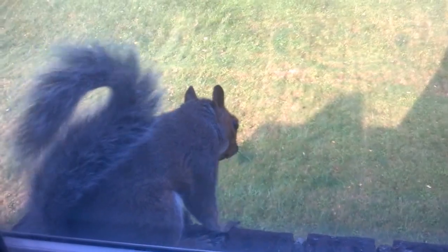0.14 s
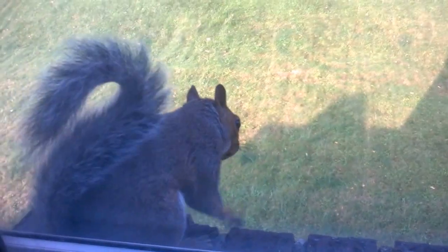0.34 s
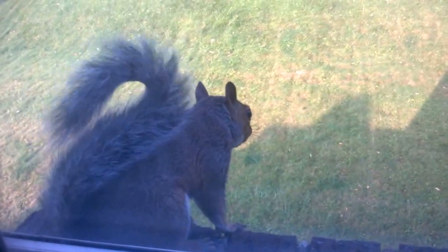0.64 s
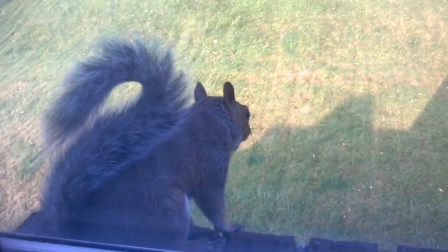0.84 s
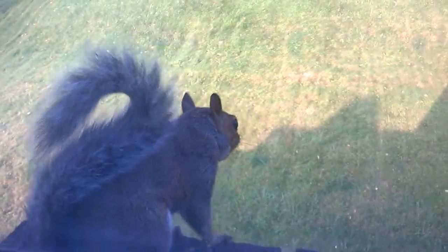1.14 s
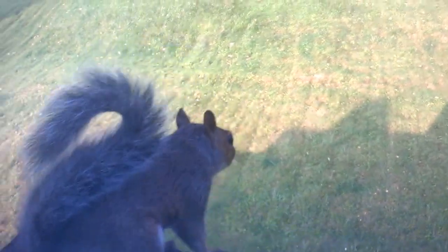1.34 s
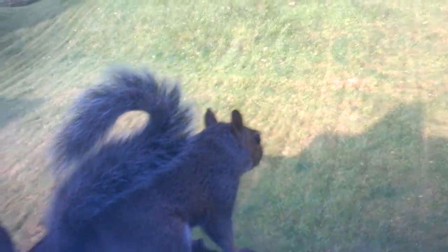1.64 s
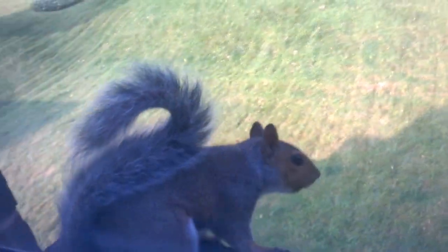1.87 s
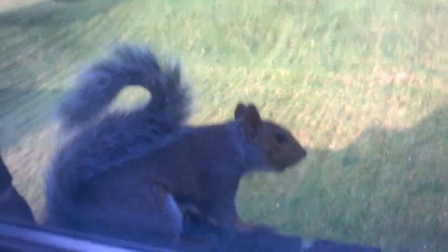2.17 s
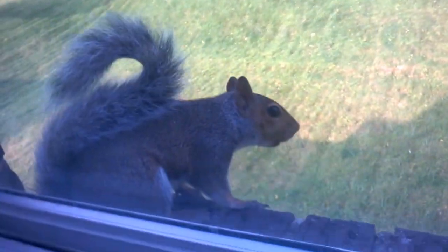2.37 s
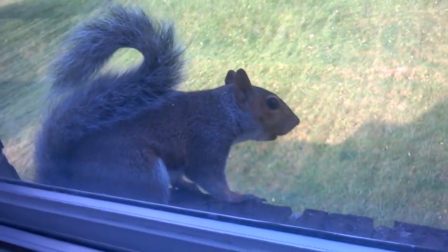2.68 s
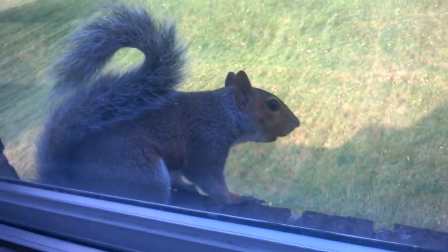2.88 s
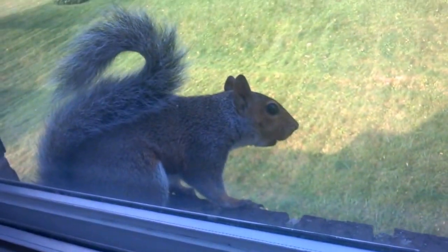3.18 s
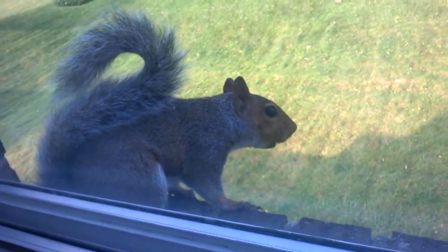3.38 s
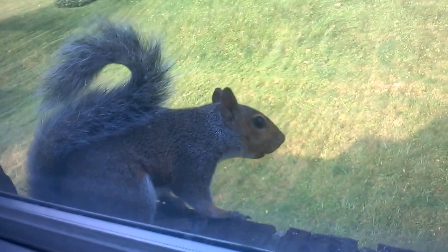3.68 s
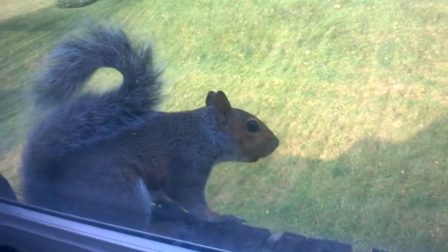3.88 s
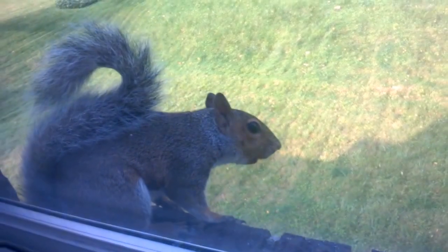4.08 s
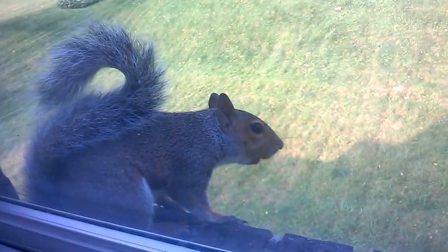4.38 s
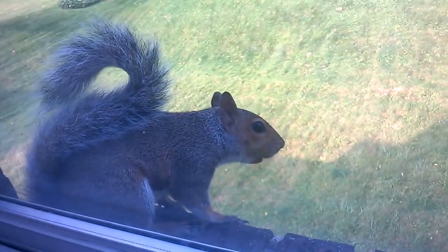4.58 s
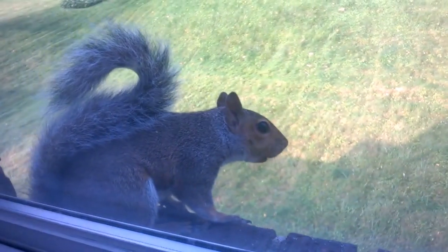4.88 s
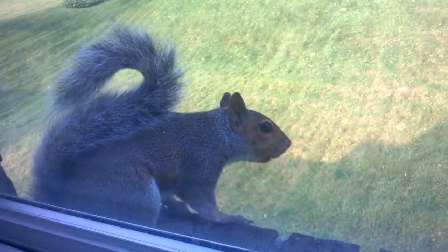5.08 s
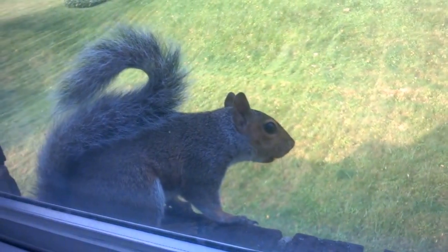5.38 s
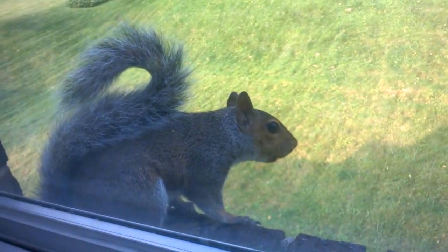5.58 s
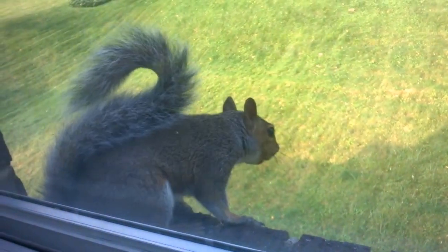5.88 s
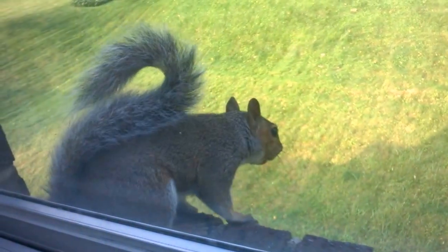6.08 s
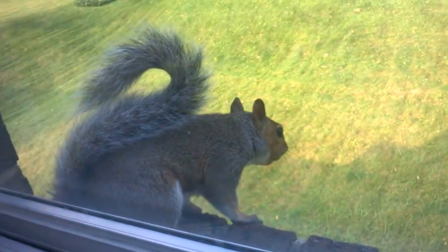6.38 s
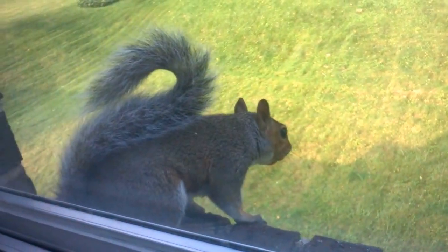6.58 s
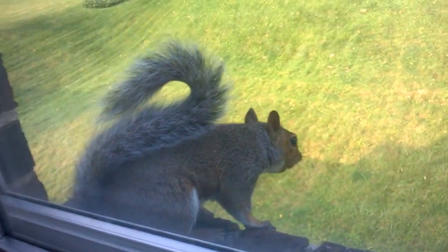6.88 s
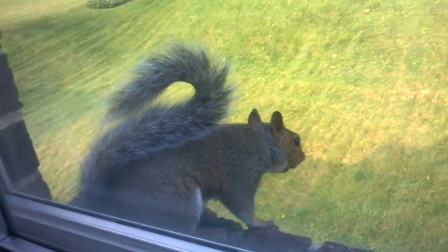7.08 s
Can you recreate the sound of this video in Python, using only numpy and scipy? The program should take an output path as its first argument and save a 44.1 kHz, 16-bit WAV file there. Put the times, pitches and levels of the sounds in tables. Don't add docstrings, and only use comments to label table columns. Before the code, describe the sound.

A run of hoarse, nasal squirrel barks opens brightly, then grows duller and softer. A sharp claw tick and dry fur scrapes fall between them. Isolated rasping quacks come next, starting high and breaking rough as they fall, then three muffled barks and a final quack. The animal is near and mostly dry, with a brief brick echo; behind it are quiet lawn insects, open air and low passing traffic.

```python
import sys
import numpy as np
from scipy import signal
from scipy.fft import rfft, irfft
from scipy.io import wavfile
from scipy.ndimage import uniform_filter1d

SR = 44100
rng = np.random.default_rng(int(sys.argv[2]) if len(sys.argv) > 2 else 0)


def file_out(sig):
    cols = np.atleast_2d(sig).T
    lim = np.clip(cols, -1, 1)
    pcm = np.round(lim * 32767).astype(np.int16)
    wavfile.write(sys.argv[1], SR, pcm)


def makeup_ratio(level_db):
    decades = np.asarray(level_db, float) / 20
    return 10 ** decades


N = 318843

# f/Hz, width/Hz, level/dB
THROAT_MODES = [(300, 150, -28.5), (599, 104, -11), (850, 53, 3.5)]
# f/Hz, width/Hz, level/dB
MOUTH_MODES = [(1724, 143, -7.5), (1867, 136, -7.5), (2290, 87, 3), (2527, 93, -9.5)]
# f/Hz, width/Hz, level/dB
LIP_MODES = [(2733, 110, 11.5), (3060, 148, 1.5)]
# t/s, cheek level/dB, upper lips level/dB, nose f/Hz, upper nose level/dB
HEAD_TURNS = [(.3, -21, 4.5, 7100, -11), (1.3, -3, 4, 7200, -17), (1.85, -13, -3, 7550, -15),
              (2.2, -6, 9, 6650, -23), (2.8, -18.5, -13.5, 8020, -9), (4.3, -18, -12, 7100, -14),
              (5.8, -10, 4, 6700, -23), (6.4, -7, -1, 6800, -29), (6.9, -15.5, -9.5, 7360, -13.5)]
# end of the rise t/s, hold/s, mouth level/dB, change over the hold/dB, pulse rate f/Hz
BARKS = [
    (0.228, 0.052, -66.5, 13.5, 292.6),
    (0.452, 0.046, -41, -14, 316.5),
    (0.674, 0.023, -42, -7, 312.2),
    (.929, 0.062, -43, -17, 321.6),
    (1.228, 0.064, -44, -12, 312.8),
    (1.831, 0.038, -49, -4, 310.3),
    (2.144, 0.073, -49.5, 4.5, 303.7),
    (5.829, 0.055, -50, 4, 300),
    (6.069, 0.037, -48, 1, 302),
    (6.323, 0.064, -49, 3, 307.5),
]
# t/s, starts shut/0-1, mouth f/Hz, lips level/dB, nose hiss level/dB
JAW = [
    (.23, 0.89, 2040, 1, -20),
    (.45, 0, 2160, -2.5, -16),
    (.93, .05, 2280, -4, -13.5),
    (1.22, .1, 2360, -12.5, -17),
    (1.83, 0.97, 2070, -13, -4),
    (2.15, .95, 1650, -18, -8),
    (5.83, 0.91, 1830, -18, -13.5),
    (6.07, .9, 1810, -21, -11),
    (6.33, 0.84, 1780, -13.5, -11),
]
BARK_THROAT_DB = (11.5, -11.5, 5.5, -8.5, -2.5)
# t/s, mouth level/dB, mouth f/Hz
QUACK_EFFORT = [
    [(2.7, -110, 2060), (2.726, -43.5, 2040), (2.766, -35.5, 2210), (2.798, -39, 2020),
     (2.852, -37.5, 2290), (2.982, -40, 2190), (3.124, -45, 2000), (3.145, -78, 1970)],
    [(4.055, -75.5, 2210), (4.095, -40, 1910), (4.133, -39.5, 1780), (4.203, -39.5, 2300),
     (4.283, -41, 2000), (4.375, -47, 2020), (4.431, -47.5, 2170), (4.455, -75, 1970)],
    [(6.84, -84, 2290), (6.876, -39, 2170), (6.92, -42.5, 2170), (7.024, -39, 2290), (7.086, -41, 2330),
     (7.156, -43.5, 2130), (7.26, -49, 1950)],
]
# t/s, f/Hz
QUACK_PITCH = [
    [(2.7, 291.5), (2.752, 319), (2.8, 321), (2.84, 291.8), (2.9, 284.6), (2.965, 262.1), (2.984, 276.2),
     (3.098, 251), (3.145, 260.5)],
    [(4.055, 230), (4.08, 278.3), (4.117, 308), (4.171, 279.7), (4.22, 277.4), (4.362, 264.1),
     (4.384, 275.5), (4.438, 284.4), (4.455, 256.9)],
    [(6.84, 212.6), (6.858, 267.8), (6.896, 315.4), (6.96, 308.4), (6.99, 276.4), (7.03, 284),
     (7.126, 266.6), (7.148, 275.2), (7.23, 256.4)],
]
# break t/s, odd multiples strengthen t/s, their strength before/0-1, roughness
VOICE_BREAKS = [
    (2.81, 2.7, .8, .11, .45),
    (4.14, 4.108, .2, .2, .3),
    (6.975, 6.932, .1, .08, .48),
]
# lips before the break/dB, lips after/dB, nose at the break/dB,
# nose fade/dB/s, throat fade/dB/s
QUACK_COLOUR = [
    (-22, -14, -25.5, -98, -67),
    (-14, -7, -28.5, -35, -24),
    (-19, -12.5, -33, -25, -61),
]
# t/s, level/dB, from f/Hz, to f/Hz, length/s
CLUCKS = [
    (.19, -59, 850, 890, 0.037),
    (2.702, -54, 850, 970, 0.054),
    (4.054, -53.5, 845, 1160, 0.087),
    (5.787, -67, 855, 900, 0.029),
    (6.026, -60, 810, 890, 0.043),
    (6.837, -60.5, 840, 1120, 0.091),
]
# t/s, peak level/dB, f/Hz, width/Hz, time to fade 60 dB/s
TICKS = [(.363, -75, 890, 1500, 0.018), (1.104, -57.5, 530, 150, 0.041), (1.156, -59, 400, 400, 0.059),
         (1.285, -46.5, 350, 500, 0.031), (1.283, -35.5, 2270, 250, 0.04),
         (1.288, -44.5, 4380, 3000, 0.0088), (1.52, -58.5, 3100, 300, 0.096), (1.524, -57, 2090, 700, 0.17),
         (1.988, -45, 4800, 3000, .01), (6.233, -64, 2320, 600, 0.13), (6.79, -62, 2380, 300, 0.2)]
# start t/s, hardest t/s, end t/s, level/dB, bright share/dB
SCRAPES = [
    (-.1, -0.007, 0.046, -72, 8.5),
    (0.114, 0.208, 0.27, -69, 3.5),
    (0.194, 0.25, 0.29, -62.5, -12),
    (.28, 0.353, 0.39, -73.5, 3),
    (1.352, 1.62, 2.2, -70.5, -22),
    (1.723, 1.79, 1.87, -66.5, -2),
    (1.797, 1.87, 1.902, -62, 6),
    (1.914, 1.963, 1.97, -71, 14.5),
    (1.857, 1.947, 2.02, -68, -25),
]
# f/Hz, level per Hz/dB
SCRAPE_BRIGHT = [(1760, -53), (3000, 7), (3510, 9), (5200, 15), (6350, 6.5), (7230, 8), (8890, 7),
                 (12300, -11), (15500, -12)]
# start t/s, length/s, level/dB, f/Hz
NEAR_CRICKET = [
    (0, .2, -80, 3800),
    (.98, .22, -79, 3650),
    (2.0, .12, -82, 3800),
    (3.58, .34, -80, 3740),
    (4.77, .38, -72, 3700),
    (5.72, .32, -77, 3720),
]
# start t/s, length/s, level/dB, f/Hz
HIGH_CRICKET = [(.05, .3, -93, 7550), (.55, .1, -82, 7550), (1.0, 0.23, -108, 7400),
                (1.26, 0.16, -77.5, 7550), (1.55, .2, -85, 7700), (2.0, .1, -88, 7550),
                (2.3, 0.25, -84, 7700), (3.25, 0.17, -91, 7650), (3.85, 0.18, -82, 7530),
                (4.55, .12, -84, 7630), (4.77, .11, -84, 7550), (5.06, .13, -84, 7600),
                (5.23, 0.11, -89, 7700), (5.49, 0.089, -86, 7550), (5.63, .13, -82, 7700),
                (6.18, 0.13, -82, 7600), (6.7, 0.12, -85, 7650)]
# f/Hz, width/Hz, level/dB
LAWN_CHORUS = [(5167, 660, -77.5), (7090, 660, -85)]
# nearest t/s, level/dB, approach/dB/s, leaving/dB/s
PASSES = [(.05, -72, 5, 5), (1.01, -63, 20, 70), (1.3, -67.5, 60, 14), (1.61, -62, 76, 50),
          (1.99, -62.5, 74, 150), (3.22, -57, 18, 5), (3.96, -53, 25, 61), (4.53, -50.5, 302, 120),
          (4.83, -60, 57, 174), (5.46, -60, 39, 34), (6.22, -56, 18, 70), (7.23, -54.5, 12.5, 25)]
# f/Hz, level per Hz/dB
RUMBLE = [(8.8, -33), (15, -8), (81, -3.5), (138, -8), (193, -22), (260, -18.5), (340, -34.5), (570, -120)]
# f/Hz, level per Hz/dB
AIR = [(88, -14), (150, -2.5), (189, -11.5), (290, -15), (346, -18), (607, -18.5), (722, -20.5), (894, -19),
       (1020, -24), (2920, -25), (3550, -26.5), (5130, -26), (7710, -31.5), (9360, -39.5), (15500, -37.5)]


def squirrel():
    voice = np.zeros(N)
    for row in BARKS:
        add(voice, *bark(*row))
    for rows in zip(QUACK_EFFORT, QUACK_PITCH, VOICE_BREAKS, QUACK_COLOUR):
        add(voice, *quack(*rows))
    for row in CLUCKS:
        add(voice, *cluck(*row))
    return voice


def bark(top, hold, top_db, change_db, hz):
    rise_open_s, rise_shut_s = 0.03, 0.044
    release_open_s, release_shut_s = 0.031, 0.02
    rise_db, release_db = -32.5, -17
    sag_at, sag_done = 0.44, 0.52
    hiss_start_db, hiss_top_db, hiss_fade_db = 7.5, 5, -13.5
    open_mouth_hz = 2240
    climb = 0.0325

    shut, mouth_hz, lips_db, nose_db = columns(JAW, top)
    start = top - rise_open_s - shut * (rise_shut_s - rise_open_s)
    release = release_open_s + shut * (release_shut_s - release_open_s)
    s = np.array([start, top, top + sag_at * hold, top + hold, top + hold + release])
    level = top_db + np.array([rise_db, 0, sag_done * change_db, change_db, change_db + release_db])

    first, opened, closed, held, last = BARK_THROAT_DB
    loudest = opened + shut * (closed - opened)
    throat = [first, loudest, (loudest + held) / 2, held, last + shut * (held - last)]
    fade = hiss_fade_db * shut
    nose = nose_db + np.array([hiss_start_db, 0, hiss_top_db + 0.69 * fade, fade, fade])
    mouth = [mouth_hz - 150 * shut, mouth_hz, (mouth_hz + open_mouth_hz) / 2, open_mouth_hz, open_mouth_hz]
    pitch = hz * (1 + climb * ((s - start) / (s[-1] - start) - 0.5))

    one = np.ones(len(s))
    throat_hz = (890 - 159 * shut) * one
    rough = (0.5 - 0.092 * shut) * one
    pairs = 0.75 * one
    return call(np.transpose([s, level, throat, lips_db * one, nose, throat_hz, mouth, pitch, rough, pairs]))


def quack(effort, pitch, fold_break, colour):
    scoop_s, scoop_hz, settle_s = 0.034, 1036, 0.034
    at, odd_s, pairs, clean, cracked = fold_break
    lips_db, late_lips_db, nose_db, nose_fade, throat_fade = colour
    start, end = effort[0][0], effort[-1][0]
    s = np.append(np.arange(start, end, 1 / 200), end)
    level, mouth = columns(effort, s)
    hz = columns(pitch, s)[0]
    opened, settled = start + scoop_s, at + settle_s
    broken = np.clip((s - at) / 0.023, 0, 1)
    late = np.maximum(s - settled, 0)

    rough_times = [start, opened + 0.015, at - 0.018, at, settled, end]
    rough = np.interp(s, rough_times, [0.35, clean, clean, cracked, 0.21, 0.45])
    odd_before = np.interp(s, [odd_s - 0.008, odd_s + 0.008], [pairs, max(pairs, 0.7)])
    odd_share = np.where(s < at, odd_before, 0.55)

    scoop = np.clip((opened + settle_s - s) / settle_s, 0, 1)
    throat_hz = scoop * scoop_hz + (1 - scoop) * (2 + broken) * hz
    corners = [start, opened, at, settled]
    throat = np.interp(s, corners, [15, -17.5, -13.5, -10]) + throat_fade * late
    lips = np.interp(s, corners, [-8, lips_db + 1, lips_db, late_lips_db]) + 11.5 * late
    nose = np.interp(s, corners[:3], [-7, nose_db - 1.5, nose_db]) + nose_fade * late
    return call(np.transpose([s, level, throat, lips, nose, throat_hz, mouth, hz, rough, odd_share]))


def cluck(s, db, from_hz, to_hz, length):
    t = np.arange(0, length, 1 / SR)
    glide = np.linspace(from_hz, to_hz, len(t))
    note = evened(resonate(rng.standard_normal(len(t)), glide, 150))
    return s, makeup_ratio(db) * steadied(note, size=300) * signal.windows.tukey(len(t), 0.6)


def call(rows):
    t = np.arange(rows[0][0], rows[-1][0] + 0.015, 1 / SR)
    mouth_db, throat_db, lips_db, nose_db, throat_hz, mouth_hz, hz, rough, odd = columns(rows, t)
    mouth_db = uniform_filter1d(mouth_db, size=round(0.011 * SR), mode="nearest")
    cheek_db, top_db, nose_hz, upper_db = (c[0] for c in columns(HEAD_TURNS, t))

    turns = np.cumsum(hz * (1 + 0.09 * rough * wander(len(t), 70))) / SR
    folds, puffs = fold_pulses(turns, rough, odd), air_puffs(turns)
    drive = np.sqrt(1 - rough ** 2) * evened(folds) + 1.3 * rough * evened(puffs)

    throat_modes = THROAT_MODES + [(1220, 220, 0.63 * cheek_db), (throat_hz, 170, 0)]
    throat = steadied(cavities(drive, throat_modes))
    throat = throat + makeup_ratio(-15.5) * cavities(puffs, [(400, 470, 0)])

    opened = [(f, w, db - 0.009 * np.maximum(f - mouth_hz, 0)) for f, w, db in MOUTH_MODES]
    mouth = steadied(cavities(drive, opened + [(mouth_hz, 260, -1), (1480, 250, cheek_db)]))
    lips = steadied(cavities(drive, LIP_MODES + [(3533, 430, top_db)]))
    nose = cavities(puffs, [(5300, 1200, -9), (nose_hz, 1000, 0), (10000, 2500, upper_db)])
    upper = makeup_ratio(np.minimum(lips_db, 2)) * lips + makeup_ratio(nose_db) * nose

    fade_in = np.clip((t - t[0]) / 0.0067, 0, 1)
    fade_out = np.clip((rows[-1][0] - t) / 0.0083, 0, 1)
    return t[0], fade_in * fade_out * makeup_ratio(mouth_db) * (mouth + makeup_ratio(throat_db) * throat + upper)


def fold_pulses(turns, rough, odd):
    size, folds = len(turns), 0
    for k in range(15):
        strength = makeup_ratio(5.5 * np.sqrt(rough) * wander(size, 22))
        slip = rng.uniform(0, 1.5) + 1.5 * rough * wander(size, 25)
        share = 1 if k % 2 else odd
        folds = folds + share * strength * np.cos(2 * np.pi * (k + 1) * turns + slip)
    return folds * makeup_ratio(4 * rough * wander(size, 150))


def air_puffs(turns):
    return (0.5 + np.exp(-(turns % 1) / 0.5)) * rng.standard_normal(len(turns))


def ticks():
    out, t = np.zeros(N), np.arange(5000) / SR
    for s, db, hz, width, t60 in TICKS:
        ring = resonate(rng.standard_normal(len(t)), hz, width)
        snap = ring * makeup_ratio(-60 * t / t60) * np.minimum(t / t60 * 20, 1)
        add(out, s, makeup_ratio(db) * snap / abs(snap).max())
    return out


def ledge(x, wet_db=-13, t60=0.15):
    t = np.arange(4000) / SR
    signs = rng.choice([-1., 1.], len(t))
    sparse = rng.random(len(t)) < 0.05
    taps = signs * sparse * makeup_ratio(-60 * t / t60) * (t > 0.002)
    return x + makeup_ratio(wet_db) * signal.oaconvolve(x, taps / np.linalg.norm(taps))[:N]


def scrapes():
    grain = makeup_ratio(0.97 * wander(N, 150))
    dull = cavities(rng.standard_normal(N), [(1460, 940, 9), (2330, 2800, -8), (700, 510, 7)])
    bright = coloured(SCRAPE_BRIGHT)
    out, t = np.zeros(N), np.arange(N) / SR
    for start, hardest, end, level_db, bright_db in SCRAPES:
        before = (hardest - t) / (hardest - start)
        after = (t - hardest) / (end - hardest)
        away = np.where(t < hardest, before, after)
        out += grain * makeup_ratio(level_db - 20 * away ** 2) * (dull + makeup_ratio(bright_db) * bright)
    return out


def crickets():
    near = chirps(NEAR_CRICKET, 110, trill_hz=12.0, depth=0.21)
    high = chirps(HIGH_CRICKET, 300, trill_hz=31.4, depth=0.15)
    chorus = sum(makeup_ratio(db) * evened(resonate(rng.standard_normal(N), hz, w)) for hz, w, db in LAWN_CHORUS)
    return near + high + chorus * makeup_ratio(0.34 * wander(N, 15))


def chirps(table, width, trill_hz, depth):
    out = np.zeros(N)
    for s, length, db, hz in table:
        t = np.arange(0, length, 1 / SR)
        trill = 1 + depth * np.cos(2 * np.pi * trill_hz * (t - length / 2))
        whistle = evened(resonate(rng.standard_normal(len(t)), hz, width))
        add(out, s, makeup_ratio(db) * whistle * trill * signal.windows.tukey(len(t), 0.5))
    return out


def traffic():
    t = np.arange(N) / SR
    drone = evened(resonate(rng.standard_normal(N), 82.2, 33))
    swells = [db - np.where(t < s, near * (s - t), far * (t - s)) for s, db, near, far in PASSES]
    drone_db = np.max(swells, axis=0)
    return makeup_ratio(-68.5) * coloured(RUMBLE) + makeup_ratio(drone_db - 4.5) * drone


def open_air():
    return makeup_ratio(-68.5) * coloured(AIR) * makeup_ratio(0.21 * wander(N, 19))


def evened(x):
    return x / np.sqrt(np.mean(x ** 2) + 1e-20)


def steadied(x, size=900):
    return x / np.sqrt(abs(uniform_filter1d(x ** 2, size=size)) + 0.019)


def columns(rows, t):
    s, *rest = np.transpose(rows)
    return [np.interp(t, s, c) for c in rest]


def add(mix, s, sound):
    part = mix[round(s * SR):][:len(sound)]
    part += sound[:len(part)]


def resonate(x, hz, width):
    turn = np.exp(2j * np.pi * np.cumsum(hz * np.ones(len(x))) / SR)
    r = np.exp(-np.pi * width / SR)
    return 2 * (turn * signal.lfilter([(1 - r) ** 2], [1, -2 * r, r * r], x / turn)).real


def cavities(x, modes):
    total = 0
    for k, (hz, width, db) in enumerate(modes):
        total = total + (-1) ** k * makeup_ratio(db) * resonate(x, hz, 1.3 * width)
    return evened(total)


def wander(size, hz):
    smooth = signal.butter(2, hz, fs=SR)
    return evened(signal.lfilter(*smooth, rng.standard_normal(size + 2000))[2000:])


def coloured(points):
    f, db = np.transpose(points)
    hz = np.fft.rfftfreq(N, 1 / SR)
    gain = makeup_ratio(np.interp(np.log(hz + 1), np.log(f), db, left=-90, right=-90))
    return evened(irfft(rfft(rng.standard_normal(N)) * gain, N))


def scene():
    near = ledge(squirrel() + ticks())
    return (near + scrapes() + crickets() + traffic() + open_air())[None]


def low_pass(x):
    return signal.sosfilt(signal.butter(12, 15660, fs=SR, output="sos"), x)


def record(dry):
    return low_pass(dry)


dry = scene()
out = record(dry)
file_out(out)
```